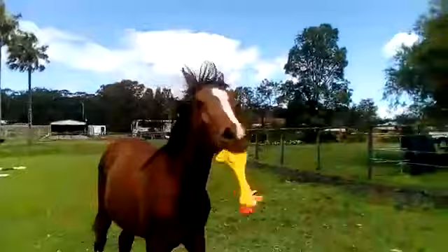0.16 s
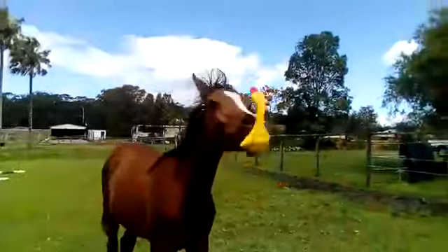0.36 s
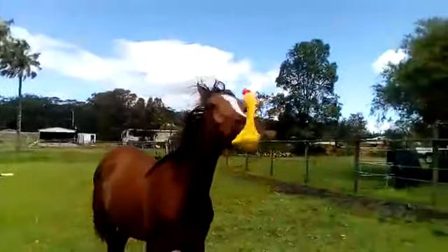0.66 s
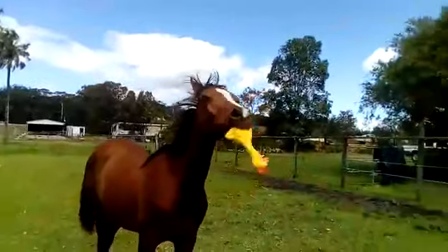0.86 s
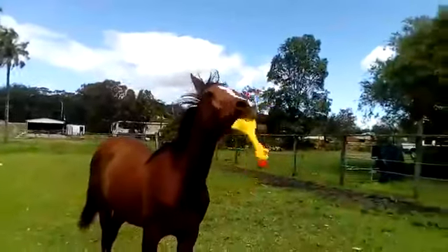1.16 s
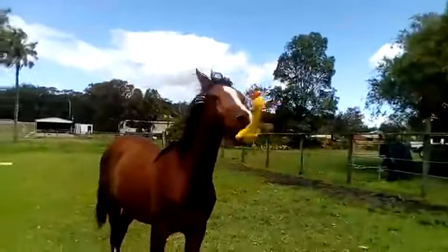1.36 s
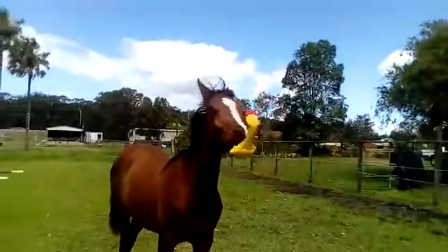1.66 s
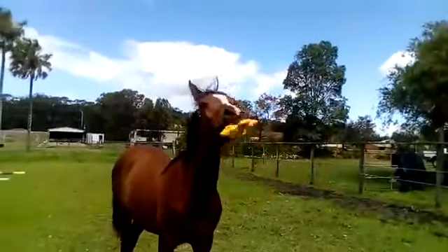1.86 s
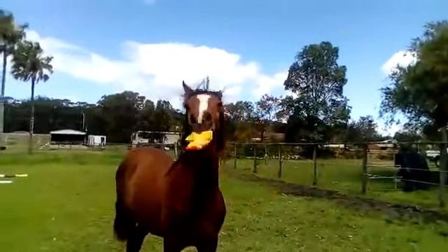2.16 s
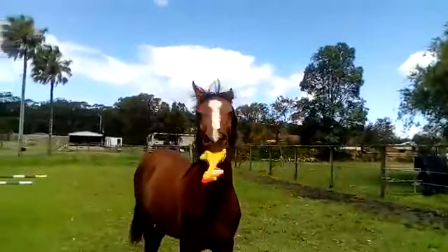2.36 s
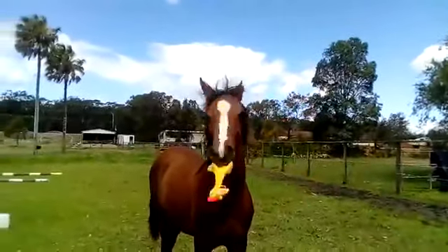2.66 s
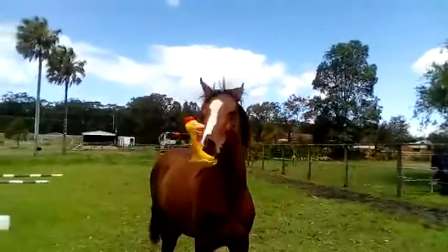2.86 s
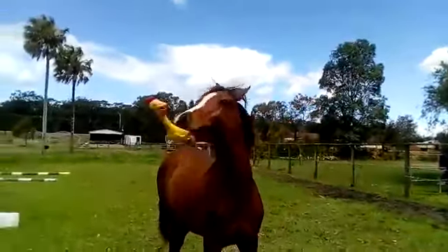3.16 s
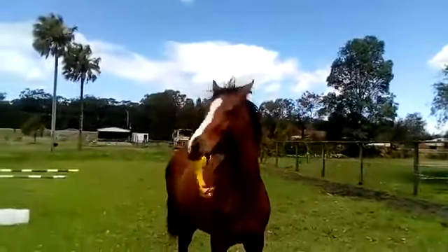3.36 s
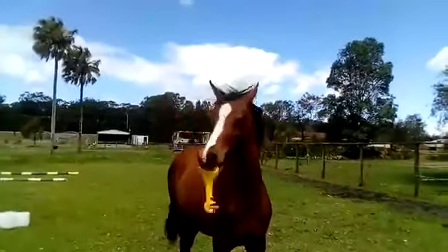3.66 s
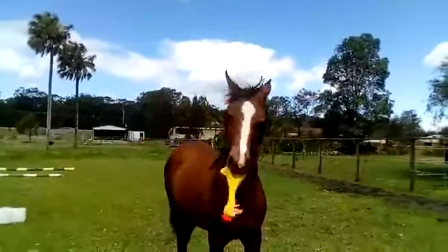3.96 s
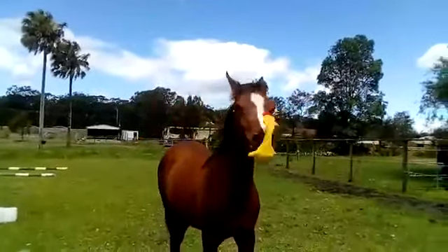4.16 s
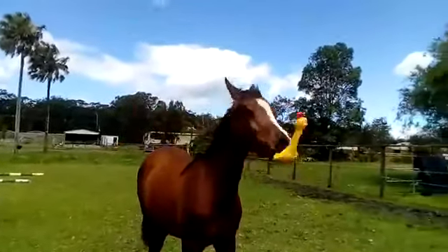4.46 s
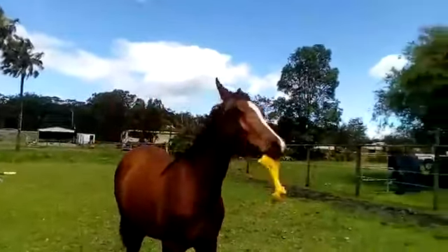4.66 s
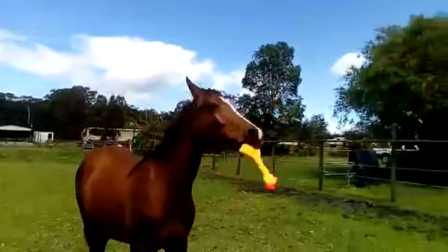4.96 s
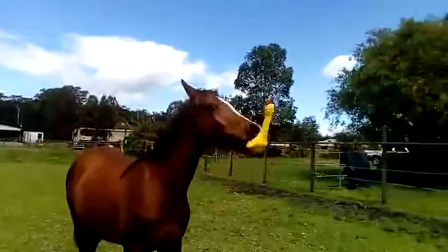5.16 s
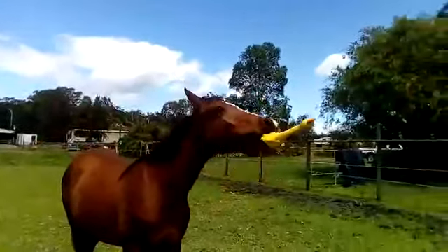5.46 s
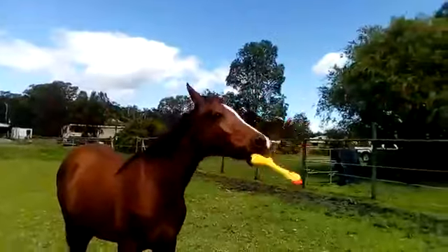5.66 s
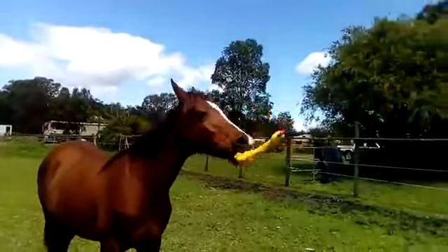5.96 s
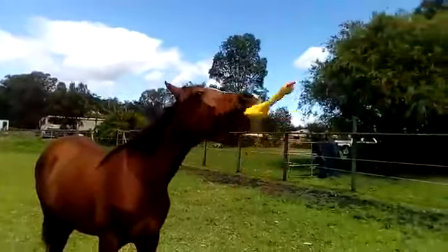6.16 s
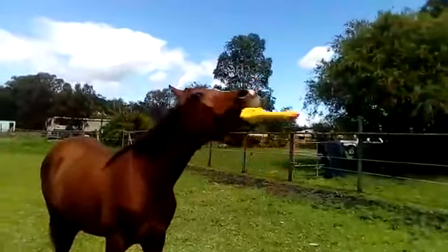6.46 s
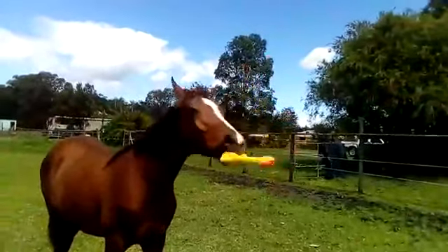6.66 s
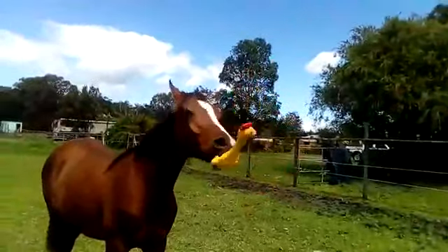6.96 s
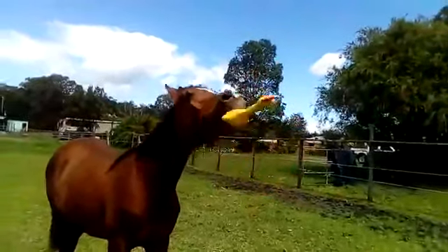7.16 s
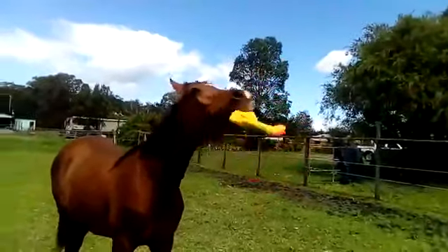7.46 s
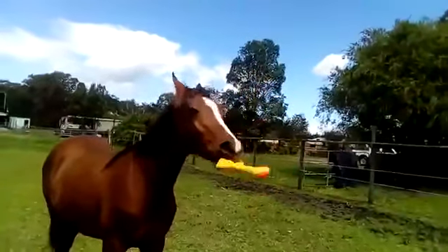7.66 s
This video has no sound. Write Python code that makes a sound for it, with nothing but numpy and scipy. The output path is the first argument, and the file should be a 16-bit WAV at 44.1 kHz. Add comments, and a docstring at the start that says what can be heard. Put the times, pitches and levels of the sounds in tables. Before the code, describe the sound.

From the first instant a rubber chicken squawks continuously as a horse swings it in a paddock, with about six outward squeals a second alternating with inward honks, each roughly a tenth of a second or shorter. The outward squawks are harsh and buzzy, leaping from about 450 to 1000-2000 Hz and cracking into two pitches; the refills are rounder, around 600-1000 Hz. Low wind puffs thump the microphone mainly at 0.3-0.6 s. Squeals grow highest between 1.5 and 4.8 s, with treble brightest near 3.8 s. From about 5 to 6.3 s they become lower, softer and more croaking, with dull rubber knocks near 5.5, 5.9 and 6.2 s. Strong alternating squawks return from 6.4 s and continue to the end at 7.8 s. Beneath are quiet outdoor air, a faint wavering 100 Hz hum and occasional distant rasping calls, probably a bird. The space is open and nearly dry.

```python
"""A rubber chicken squawks as a horse swings it in a paddock, squeezing it with every toss of its head.
Air driven out and sucked back sounds two reeds; hard blows bend them up and split them into two pitches.
Each reed is a sum of harmonics with hiss, shaped by the low and high resonances of the hollow neck.
Shaped noise makes the gusts on the microphone and the outdoor air; decaying sines make soft rubber knocks.
Behind lie a low wavering sine hum and a faint rasping call of gliding narrow noise, probably a far bird."""
import sys
import numpy as np
from scipy import signal
from scipy.fft import rfft, irfft
from scipy.io import wavfile
from scipy.ndimage import uniform_filter1d, map_coordinates

SR = 44100
rng = np.random.default_rng(int(sys.argv[2]) if len(sys.argv) > 2 else 0)


def wav_record(signal):
    """Record a signal, one row per channel, as 16-bit PCM in the file named by sys.argv[1]."""
    frames = np.transpose(np.atleast_2d(signal))
    bounded = np.clip(frames, -1, 1)
    # unit amplitude maps onto the largest positive 16-bit level
    quanta = np.round(bounded * 32767).astype(np.int16)
    wavfile.write(sys.argv[1], SR, quanta)


N = 345303
EDGE_HZ = 13300  # upper band edge

# Reed laws. calm/hard: value at no strain and at full strain, reached strain_hz above free_hz.
# sag: share of pitch lost at the ends of a stroke; swell: power of the sine arch that sets the level.
# crest_share: half-width of the bend as a share of the stroke; crest_steep: squareness of its top.
# per_khz: change per kHz of bend (lowers swell; widens the squeeze's crest, narrows the refill's).
# jitter: pitch unevenness (share).
# treble_swell: swell of the treble relative to the low part; split_buzz_db: rattle level in the treble.
# follow: share of the bend taken by the second vibration; split_db: its level.
# pure_db: cut of the main reed's overtones at full unrest.
# Outward reed: low and harsh
OUT_REED = dict(
    free_hz=448.1, strain_hz=233, calm_sag=0.0671, hard_sag=0.16076,
    calm_swell=0.61, hard_swell=1.517, swell_per_khz=0.481,
    crest_share=0.14, share_per_khz=0.17, crest_steep=2.4,
    treble_db=-7.5, treble_swell=0.66, split_buzz_db=-1, follow=0.3, split_db=-7,
    calm_jitter=0.0047, hard_jitter=0.01993, hiss_db=-3, pure_db=-4)
# Inward reed: higher, rounder, cleaner
IN_REED = dict(
    free_hz=604.4, strain_hz=100, calm_sag=0.1073, hard_sag=0.23,
    calm_swell=0.398, hard_swell=0.83, swell_per_khz=0.1,
    crest_share=0.24, share_per_khz=-0.26, crest_steep=2.429,
    treble_db=-13, treble_swell=0.582, split_buzz_db=7.5, follow=0.15, split_db=-17,
    calm_jitter=0.0061, hard_jitter=0.00681, hiss_db=-13, pure_db=-2)

# Air forced out: (start [s], rise to crest [s], fall [s], crest pitch [Hz], level [dB])
SQUEEZES = [(0.035, 0.0376, 0.0257, 1023, -17), (0.174, 0.0461, 0.0417, 1301, -16),
            (0.354, 0.0306, 0.0309, 1137, -21), (0.517, 0.0325, 0.02995, 1317, -17.5),
            (0.68, 0.029, 0.0353, 855, -22), (0.815, 0.05185, 0.0302, 1240, -16.5),
            (0.996, 0.0332, 0.0278, 752, -23.5), (1.144, 0.04335, 0.0389, 1350, -16.5),
            (1.323, 0.02296, 0.033, 841, -24.0), (1.467, 0.04424, 0.0379, 1585, -18.5),
            (1.633, 0.03135, 0.0339, 1316, -21.5), (1.776, 0.0436, 0.0464, 1801, -19.5),
            (1.951, 0.0247, 0.0274, 1251, -21), (2.086, 0.04026, 0.0394, 1977, -19.5),
            (2.266, 0.01165, 0.0291, 843.2, -21.5), (2.407, 0.04646, 0.0491, 1334, -17.0),
            (2.596, 0.0172, 0.0238, 863.4, -24), (2.718, 0.0364, 0.03634, 2055, -20),
            (2.896, 0.0202, 0.028, 860, -22), (3.028, 0.0363, 0.0517, 1375, -16.5),
            (3.224, 0.0071, 0.0211, 461.3, -25), (3.353, 0.04413, 0.04266, 1378, -15.5),
            (3.535, 0.0252, 0.0288, 1302, -18.5), (3.682, 0.0408, 0.0399, 1964, -19.0),
            (3.849, 0.02694, 0.0262, 1236, -18.5), (3.999, 0.0464, 0.0434, 1734, -18.5),
            (4.172, 0.0265, 0.0289, 1387, -18.5), (4.319, 0.0384, 0.0341, 1826, -20),
            (4.484, 0.0269, 0.02474, 1361, -19), (4.635, 0.0446, 0.0397, 1758, -19.5),
            (4.808, 0.02247, 0.0289, 1255, -20), (4.981, 0.037, 0.043, 1070, -17.5),
            (5.185, 0.01375, 0.0162, 440.8, -35), (5.34, 0.0289, 0.0352, 574.7, -21.5),
            (5.505, 0.02857, 0.0373, 837.1, -23), (5.703, 0.0325, 0.0324, 466.2, -20.5),
            (5.907, 0.0103, 0.0175, 430.8, -31), (6.072, 0.019, 0.0366, 446.4, -23),
            (6.228, 0.0438, 0.0106, 439.2, -27.0), (6.379, 0.0433, 0.0536, 1241, -16.5),
            (6.565, 0.0301, 0.0285, 561.4, -24), (6.72, 0.04444, 0.05085, 1368, -16.0),
            (6.893, 0.03204, 0.0323, 1740, -20), (7.047, 0.04514, 0.04885, 1665, -16.5),
            (7.23, 0.031, 0.028, 842.8, -21.0), (7.393, 0.0395, 0.0538, 1360, -16.5),
            (7.568, 0.0272, 0.0321, 842.7, -21.5), (7.721, 0.05, 0.052, 1602, -17.5)]
# Air sucked back as the rubber springs out: (start [s], rise to crest [s], fall [s], crest pitch [Hz], level [dB])
REFILLS = [(-0.025, 0.0284, 0.0271, 596.6, -15.0), (0.103, 0.0348, 0.0309, 768.7, -16),
           (0.264, 0.0352, 0.0481, 587.3, -18.5), (0.424, 0.0325, 0.0387, 769.4, -18),
           (0.586, 0.0395, 0.0503, 584.8, -19.5), (0.748, 0.0272, 0.0416, 743.3, -20),
           (0.885, 0.0606, 0.0389, 599.8, -19.5), (1.061, 0.0332, 0.0514, 770.8, -20),
           (1.231, 0.0352, 0.0436, 588.7, -22), (1.379, 0.0364, 0.0488, 764.8, -21.5),
           (1.556, 0.0488, 0.0222, 582.5, -22.5), (1.702, 0.039, 0.0145, 729, -20.0),
           (1.888, 0.0297, 0.0192, 590.8, -21.0), (2.009, 0.038, 0.0263, 812.3, -19.5),
           (2.183, 0.0477, 0.0081, 585, -19.5), (2.324, 0.0462, 0.0301, 724.5, -18.0),
           (2.509, 0.0327, 0.0288, 593.3, -20.0), (2.657, 0.0202, 0.0228, 720.5, -19.5),
           (2.827, 0.021, 0.0259, 584.3, -19.5), (2.953, 0.0336, 0.0376, 889, -17.5),
           (3.129, 0.0235, 0.039, 593.8, -19), (3.273, 0.0405, 0.0303, 751.4, -18.5),
           (3.453, 0.0274, 0.0448, 592, -18.5), (3.605, 0.0401, 0.0363, 820, -21.0),
           (3.79, 0.0238, 0.0319, 591, -19.5), (3.912, 0.0485, 0.0365, 889.8, -19),
           (4.105, 0.0358, 0.0332, 582.2, -21), (4.233, 0.0432, 0.0334, 908, -19.0),
           (4.42, 0.0272, 0.0353, 595, -20.5), (4.542, 0.0437, 0.0497, 1012, -20.5),
           (4.735, 0.0388, 0.0292, 592.3, -22), (4.867, 0.0465, 0.0692, 1012, -21.0),
           (5.068, 0.053, 0.0445, 600.2, -22.5), (5.219, 0.0408, 0.073, 772.7, -22.0),
           (5.409, 0.0297, 0.0556, 585.7, -22.5), (5.573, 0.0375, 0.0862, 767.5, -21.5),
           (5.777, 0.038, 0.0582, 574.3, -24.5), (5.958, 0.0282, 0.0645, 587.2, -22.5),
           (6.141, 0.0382, 0.029, 566, -24.5), (6.308, 0.0126, 0.0425, 582, -22.5),
           (6.48, 0.0432, 0.0287, 572.1, -23), (6.63, 0.0417, 0.025, 599.8, -18.5),
           (6.82, 0.0335, 0.0363, 582.5, -22.5), (6.954, 0.0478, 0.0335, 749, -19.0),
           (7.149, 0.046, 0.0306, 566, -22.5), (7.298, 0.0351, 0.0628, 749.3, -19.5),
           (7.498, 0.0308, 0.0372, 580.6, -21.5), (7.629, 0.042, 0.0477, 765.6, -18.5)]
# Treble gain as the horse turns toward the microphone and away: (time [s], level [dB])
FACING = [(0, 1.5), (1.1, -0.07), (2, 0.57), (2.7, 2.5), (3.8, 4), (4.6, -0.5), (5.5, -3.5), (6.6, -2.4),
          (7.8, -0.15)]
# Beak beams treble forward, in cumulative steps: (above [Hz], share of the facing dB [1])
BEAK_BEAM = [(1900, 0.222), (3700, 0.456), (7200, 0.646)]


def chicken():
    """Harsh squeezes alternate with rounder refills; the treble swings with the horse's head."""
    out, responses = np.zeros(N), neck()
    for row in SQUEEZES:
        add(out, *squawk(row, responses, OUT_REED))
    for row in REFILLS:
        add(out, *squawk(row, responses, IN_REED))
    facing_db = np.interp(np.arange(N) / SR, *np.transpose(FACING))
    for above_hz, share in BEAK_BEAM:
        high_pass = signal.butter(4, above_hz, "high", fs=SR, output="sos")
        top = signal.sosfiltfilt(high_pass, out)
        out = out + top * (amp(share * facing_db) - 1)
    return out


BEND_BUZZ_DB = 2  # extra buzz at a 1 kHz bend, growing with its square
LOCK_HZ, THIN_HZ = 1944, 594  # pitch where the reed locks into one tone; bend that halves the rattle's body
FLUTTER_DB, FLUTTER_HZ = 2.63, 76.06  # unsteady flow through a strained reed
USUAL_DB, SOFT_BUZZ = -20, 0.286  # softer strokes regain this share of the difference in buzz


def squawk(row, responses, law):
    """One stroke of air: the main reed bends up with pressure, a second vibration lags near rest."""
    start, rise, fall, crest_hz, level_db = row
    u, arch, swell, strain, over_khz, base_hz, bend_hz = stroke(rise, fall, crest_hz, law)
    low_response, high_response = responses

    unrest = strain * np.exp(-((base_hz + bend_hz) / LOCK_HZ) ** 12)  # one steady tone at the very top
    jitter = law["calm_jitter"] + law["hard_jitter"] * unrest
    bite = amp(law["pure_db"] * unrest)  # held open, it swings more like a sine
    main, phase = reed(base_hz + bend_hz, jitter, bite)
    second, slow_phase = reed(base_hz + law["follow"] * bend_hz, 1.287 * jitter, 1.0)

    split = unrest * amp(law["split_db"] + 2.73 * wander(49.17, len(u)))
    rattle = split * (second + 0.21 * main * np.cos(slow_phase))
    opening = 1 + np.cos(phase)
    hiss = amp(law["hiss_db"]) * (0.79 + unrest) * opening * rng.standard_normal(len(u))

    flutter_db = FLUTTER_DB * strain * wander(FLUTTER_HZ, len(u))
    sway = amp(flutter_db - 2.55 * (u - 0.5))  # the flow tires a little
    push = arch ** swell * sway
    keen_early = amp(-2.5 * (u - 0.5))
    slap = arch ** (0.367 + swell * law["treble_swell"]) * sway ** 0.187 * keen_early

    depth = 1.275 / (1 + (bend_hz / THIN_HZ) ** 2)  # at high pressure the rattle has little body
    low = signal.fftconvolve((main + depth * (rattle + hiss)) * push, low_response)
    buzz = main + amp(law["split_buzz_db"]) * rattle + hiss
    high = signal.fftconvolve(buzz * slap, high_response)
    high = flex(high, depth_db=5.0, span_hz=426.35, span_s=0.02297)
    loudness = np.sqrt(np.abs(uniform_filter1d(unit(high) ** 2, 90)))
    high = high / (1 + (loudness / 1.904) ** 4) ** 0.294  # reed travel limits the harshest slaps

    bend_buzz_db = BEND_BUZZ_DB * over_khz ** 2
    soft_buzz_db = SOFT_BUZZ * min(USUAL_DB - level_db, 4)
    treble_db = law["treble_db"] + bend_buzz_db + soft_buzz_db
    size = np.sqrt(len(u) / len(low))  # offsets the length added by the neck's ringing
    return start, amp(level_db) * size * (unit(low) + amp(treble_db) * unit(high))


WIDEST_CREST = 0.3  # upper limit of the bend's half-width (share of the stroke)
# Free pitch: wobble (share), its rate, drop through each stroke (share)
WOBBLE, WOBBLE_HZ, DROOP = 0.00769, 22.4, 0.0235


def stroke(rise, fall, crest_hz, law):
    """Pressure arches; the reed follows to its free pitch, and any more bends it up around the crest."""
    rise, fall = max(rise, 0.005), max(fall, 0.005)
    t = np.arange(-rise, fall, 1 / SR)
    u = np.interp(t, [-rise, 0, fall], [0, 0.5, 1])  # progress through the stroke
    arch = np.abs(np.sin(np.pi * u))

    over_hz = max(crest_hz - law["free_hz"], 0)
    over_khz = over_hz / 1000
    strain = min(over_hz / law["strain_hz"], 1)  # gentle strokes stay clean

    sag = law["calm_sag"] + strain * (law["hard_sag"] - law["calm_sag"])
    base_hz = (crest_hz - over_hz) * (1 - sag + sag * arch ** 0.5912)  # sags at the weak ends
    base_hz = base_hz * (1 + WOBBLE * wander(WOBBLE_HZ, len(t)) - DROOP * (u - 0.5))

    share = law["crest_share"] + law["share_per_khz"] * over_khz
    width_s = (rise + fall) * np.clip(share, 0.05, WIDEST_CREST)
    bend_hz = over_hz * np.exp(-np.abs(t / width_s) ** law["crest_steep"])  # leaps up, holds, drops back

    swell = law["calm_swell"] + strain * (law["hard_swell"] - law["calm_swell"])
    swell = swell - law["swell_per_khz"] * over_khz
    return u, arch, abs(swell), strain, over_khz, base_hz, bend_hz


def reed(hz, jitter, bite):
    """A reed slaps shut once a cycle, unevenly; bite scales overtones that drift in level one by one."""
    fast = jitter * wander(254.49, len(hz))
    slow = (0.00275 + 1.1855 * jitter) * wander(69.98, len(hz))
    hz = hz * (1 + fast + slow)
    phase = 2 * np.pi * (np.cumsum(hz) / SR + rng.random())
    k = np.arange(2, 25)[:, None]
    first, last = rng.standard_normal((2, len(k), 1))
    drift = first + (last - first) * np.linspace(0, 1, len(hz))
    drift_db = np.minimum(k - 1, 3) * 1.806 * np.clip(drift, -2, 1.5)
    overtones = amp(drift_db) * (k * hz < EDGE_HZ)
    return np.cos(phase) + bite * (overtones * np.cos(k * phase)).sum(0), phase


# Broad low resonance of the hollow neck: (frequency [Hz], gain [dB])
NECK_LOW = [(250, -33), (380, -3), (460, -0.5), (580, 6), (760, 7), (950, 9), (1180, 6), (1400, 5.5),
            (1550, -6), (1750, -21), (2050, -20.5), (2500, -47)]
# Higher neck modes: (frequency [Hz], width [Hz], gain [dB])
NECK_MODES = [(2371, 276.4, 2), (3121.5, 209.5, 5.5), (3916, 193, 1.5), (4372, 316, 2.5),
              (4979.7, 221.3, 3.5), (5787, 848, -4), (6826, 486, -3.5), (7710, 692, -13.5),
              (9576, 736, -20), (11280, 420, -37)]
# Notches in the neck's treble, with one slight lift: (frequency [Hz], width [Hz], gain [dB])
NECK_NOTCHES = [(2052.4, 275.4, -15), (2946, 220, 0.5), (3778, 98, -9.5), (9095, 491, -8.5),
                (11150, 314, -16)]


def neck():
    """Low and high impulse responses of the toy's hollow neck, from its resonances and notches."""
    hz = np.fft.rfftfreq(4096, 1 / SR)
    modes = sum(amp(db) / (1 + ((hz - f) / width) ** 2) ** 1.623 for f, width, db in NECK_MODES)
    notches_db = sum(db * np.exp(-((hz - f) / width) ** 2) for f, width, db in NECK_NOTCHES)
    return causal(gain_at(NECK_LOW, hz)), causal(modes * amp(notches_db))


def flex(x, depth_db, span_hz, span_s):
    """The soft neck bends and the beak swings, so peaks and hollows drift through the treble."""
    hz, t, z = signal.stft(x, SR, nperseg=256, noverlap=192)
    where = np.meshgrid(hz / span_hz, t / span_s, indexing="ij")
    patches = map_coordinates(rng.standard_normal((64, 32)), where, order=3, mode="wrap")
    patches = np.clip(patches, -2, 2)
    return signal.istft(z * amp(depth_db * patches), SR, nperseg=256, noverlap=192)[1][:len(x)]


# Soft low knocks as the toy flops about: (time [s], peak level [dB])
KNOCKS = [(1.49, -42.5), (3.84, -35.5), (5.494, -32), (5.876, -26), (6.225, -27.5), (6.358, -36),
          (6.558, -31), (7.224, -30)]


def knocks():
    """Dull thuds of hollow rubber: low sines, quickly damped."""
    out, t = np.zeros(N), np.arange(3000) / SR
    for time_s, db in KNOCKS:
        hz = rng.uniform(211.2, 230.4)
        thud = np.sin(2 * np.pi * hz * t) * (1 - np.exp(-t / 0.0013)) * np.exp(-t / 0.01)
        add(out, time_s - 0.003, amp(db) * thud / np.abs(thud).max())
    return out


GUST_POINT = 1  # 1 pointed puff, 2 round
WIND_LOW_HZ = 42  # the microphone passes little below
# Puffs of wind on the microphone: (peak time [s], half-length [s], relative level [dB])
GUSTS = [(0.328, 0.0162, -18), (0.358, 0.0071, -7), (0.394, 0.0076, -7.5), (0.405, 0.0075, -9.5),
         (0.479, 0.0095, -16.5), (0.509, 0.0096, -19.5), (0.57, .018, -19.5), (0.785, 0.0246, -27.5),
         (1.767, 0.029, -41.5), (5.61, 0.072, -43.5), (6.298, 0.0197, -26.5), (6.361, 0.0116, -32.5),
         (6.879, 0.05, -30.5), (7.036, 0.018, -26), (7.57, 0.015, -35), (7.665, 0.041, -33)]
# Spectrum of a strong gust: (frequency [Hz], relative density [dB per Hz])
BUFFET = [(20, -37), (55, -31.5), (120, 1.5), (200, 4), (300, -7.5), (400, -20), (900, -61.5),
          (4000, -90.5)]
# Spectrum of a light gust: (frequency [Hz], relative density [dB per Hz])
RUMBLE = [(20, -20.5), (55, 1.5), (120, -0.5), (200, -11.5), (400, -42.5), (900, -57.5), (4000, -90.5)]


def wind():
    """Gusts buffet the microphone: light ones rumble, strong ones reach higher and saturate it."""
    t = np.arange(N) / SR
    level = sum(amp(db) * np.exp(-np.abs((t - s) / half) ** GUST_POINT) for s, half, db in GUSTS)
    strong = level / (level + amp(-17.5))
    turbulence = strong * noise(BUFFET, N) + (1 - strong) * noise(RUMBLE, N)
    push = amp(6.5) * level * turbulence
    saturated = 0.45 * np.tanh(push / 0.45)
    return signal.sosfilt(signal.butter(2, WIND_LOW_HZ, "high", fs=SR, output="sos"), saturated)


RASP_WIDTH_HZ = 280
# Far rasping calls: (start [s], length [s], level [dB])
RASPS = [(0.188, 0.09, -37.5), (0.839, 0.123, -49.5), (1.279, 0.1245, -39.5), (1.565, 0.16, -39),
         (3.248, 0.145, -38.5), (3.569, 0.13, -37), (4.835, 0.166, -42), (5.178, 0.135, -41.5),
         (6.801, 0.172, -42.5), (7.097, 0.154, -41), (7.753, 0.14, -38.5)]


def bird():
    """A hoarse, grainy rasp: narrow noise on a carrier that climbs through each call."""
    out = np.zeros(N)
    for start, length, db in RASPS:
        size = int(length * SR)
        turn = 2 * np.pi * np.cumsum(np.linspace(2000, 2550, size)) / SR
        rasp = wander(RASP_WIDTH_HZ, size) * np.cos(turn) + wander(RASP_WIDTH_HZ, size) * np.sin(turn)
        grain = amp(1.5 * wander(55.0, size))
        add(out, start, amp(db) * unit(rasp * grain * signal.windows.tukey(size, 0.8)))
    return out


HUM_HZ, HUM_DB, AIR_DB = 100.14, -39, -40  # mean hum pitch, hum level before its swell, air level
# Slow swell of the hum: (time [s], level [dB])
HUM_SWELL = [(0, -5.5), (1.2, 1.5), (2, -3), (2.8, -2), (3.7, 2), (4.8, 2), (5.8, 2), (7.8, -13.5)]
# Outdoor air spectrum: (frequency [Hz], relative density [dB per Hz])
AIR = [(25, -19.5), (60, -6), (110, -3), (160, -5.5), (260, -11.5), (500, -19), (1200, -13), (2000, -23.5),
       (5000, -24), (8000, -29.5), (13000, -59.5)]


def background():
    """Outdoor air as shaped noise, and a low sine hum wavering in pitch and level."""
    phase = 2 * np.pi * np.cumsum(HUM_HZ * (1 + 0.02304 * wander(7, N))) / SR
    swell_db = np.interp(np.arange(N) / SR, *np.transpose(HUM_SWELL))
    hum = np.sqrt(2) * np.sin(phase) * amp(HUM_DB + swell_db + 2 * wander(9, N))
    return hum + amp(AIR_DB) * noise(AIR, N)


def paddock(x, wet_db, t60):
    """Weak scatter from ground, fence and trees: a decaying noise tail."""
    t = np.arange(SR // 2) / SR
    tail = rng.standard_normal(len(t)) * amp(-60 * t / t60) * (t > 0.004)
    return x + amp(wet_db) * signal.fftconvolve(x, tail / np.linalg.norm(tail))[:N]


def amp(db):
    """Decibels to amplitude."""
    return 10 ** (np.asarray(db) / 20)


def unit(x):
    """Scales to rms 1."""
    return x / np.sqrt(np.mean(x ** 2) + 1e-20)


def add(mix, s, sound):
    """Lays a sound into the mix at time s, trimming what falls outside."""
    at = round(s * SR)
    sound = sound[max(-at, 0):]
    part = mix[max(at, 0):][:len(sound)]
    part += sound[:len(part)]


def gain_at(points, hz):
    """Reads a (frequency [Hz], level [dB]) table on a log-frequency axis."""
    f, db = np.transpose(points)
    return amp(np.interp(np.log(hz + 1), np.log(f), db))


def noise(points, size):
    """Noise of rms 1 with the given spectrum."""
    spectrum = rfft(rng.standard_normal(size)) * gain_at(points, np.fft.rfftfreq(size, 1 / SR))
    return unit(irfft(spectrum, size))


def wander(hz, size):
    """Smooth random motion up to about the given rate."""
    knots = rng.standard_normal(4096)
    return map_coordinates(knots, [np.arange(size) * 2 * hz / SR], order=3, mode="wrap")


def causal(gain):
    """Minimum-phase impulse response of a gain curve: it rings only after its cause."""
    log_gain = np.log(np.maximum(gain, 1e-5))
    circle = np.concatenate([log_gain, log_gain[-2:0:-1]])
    return np.fft.ifft(np.exp(np.conj(signal.hilbert(circle)))).real[:1024]


def scene():
    """Chicken and bird scatter off the paddock; knocks, wind and background stay dry."""
    scattered = paddock(chicken() + bird(), wet_db=-11.5, t60=0.0856)
    return (scattered + knocks() + wind() + background())[None]


def record(dry):
    """Band limit: a linear-phase low-pass at EDGE_HZ."""
    low_pass = signal.firwin(511, EDGE_HZ, window=("kaiser", 9), fs=SR)
    return signal.oaconvolve(dry, low_pass[None], "same")


dry = scene()
out = record(dry)
wav_record(out)
```